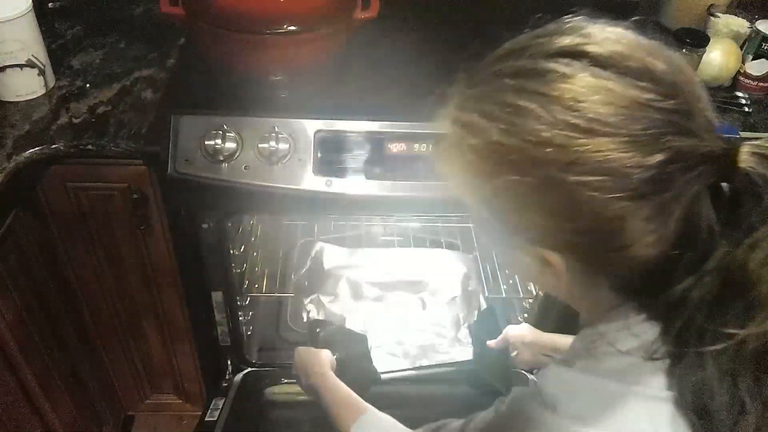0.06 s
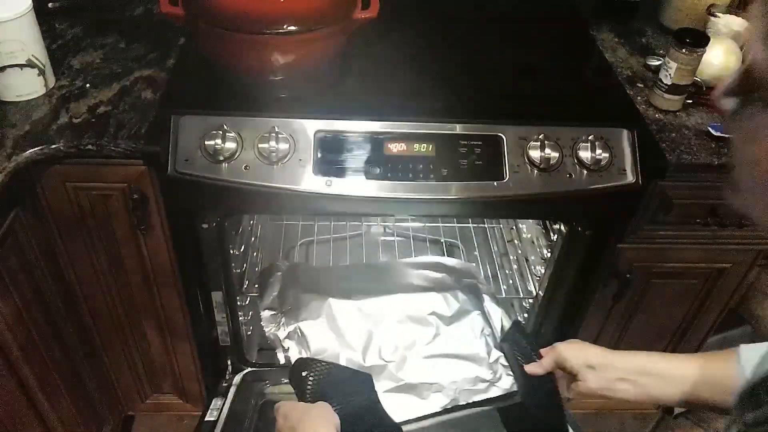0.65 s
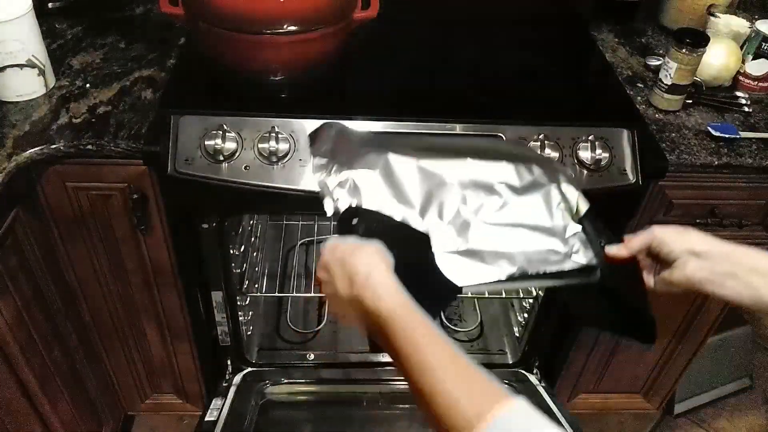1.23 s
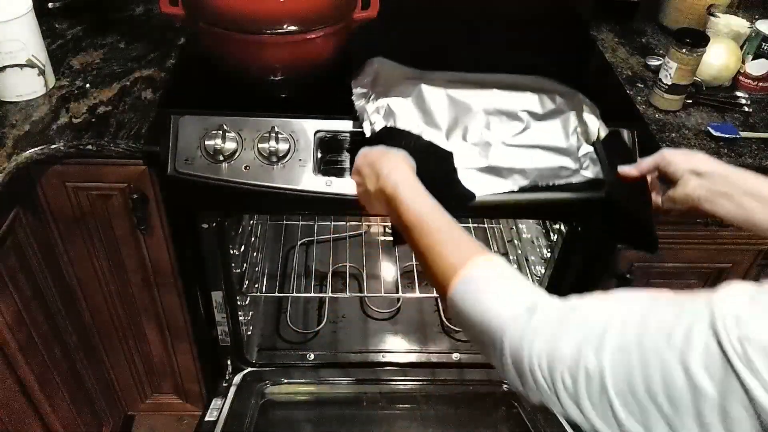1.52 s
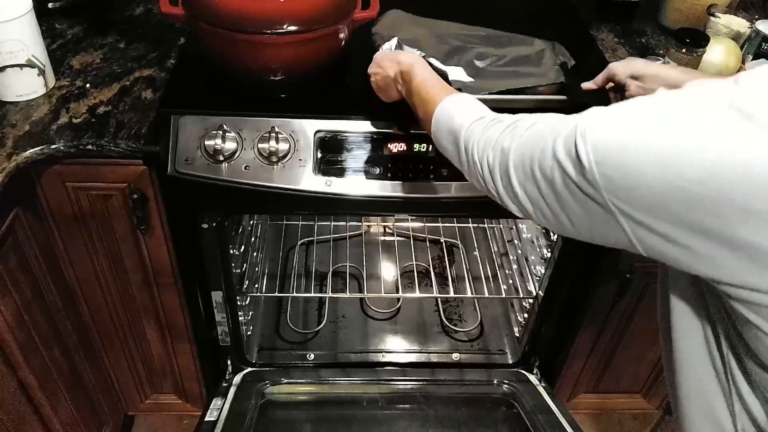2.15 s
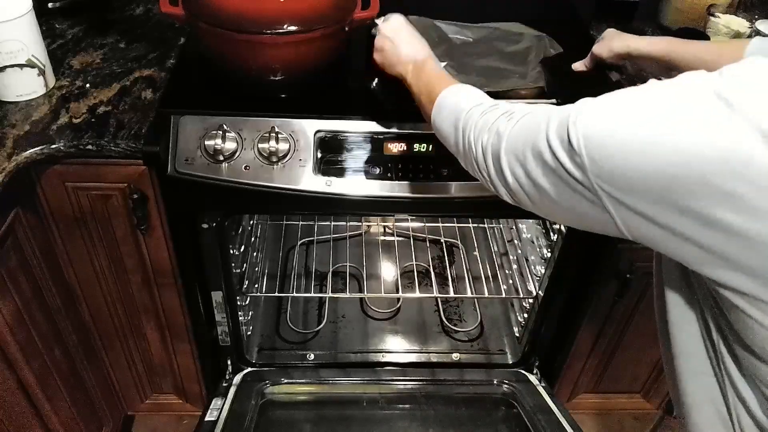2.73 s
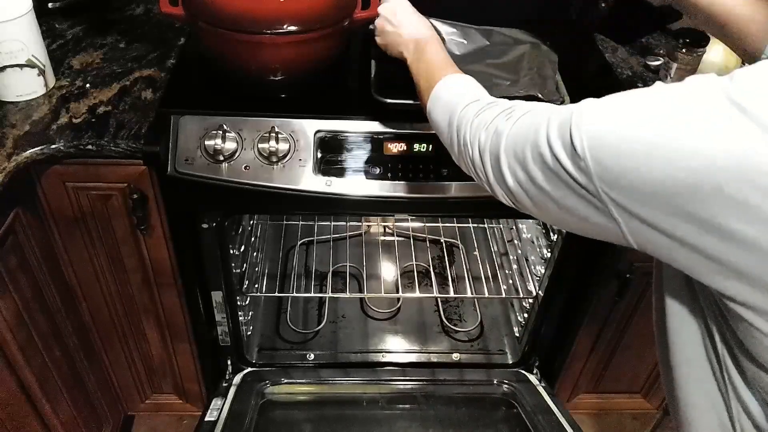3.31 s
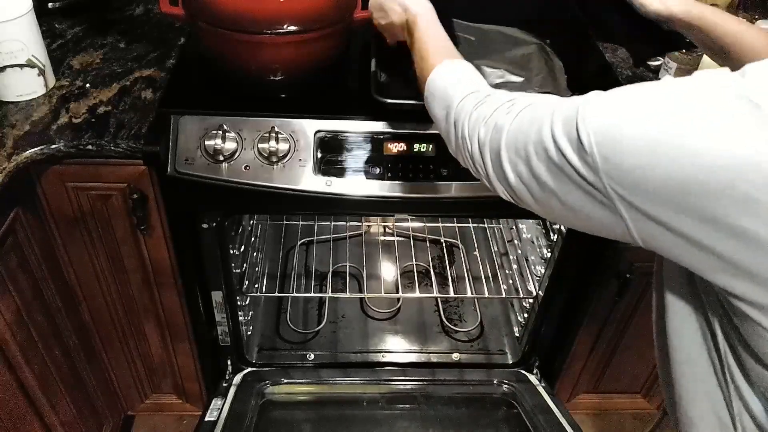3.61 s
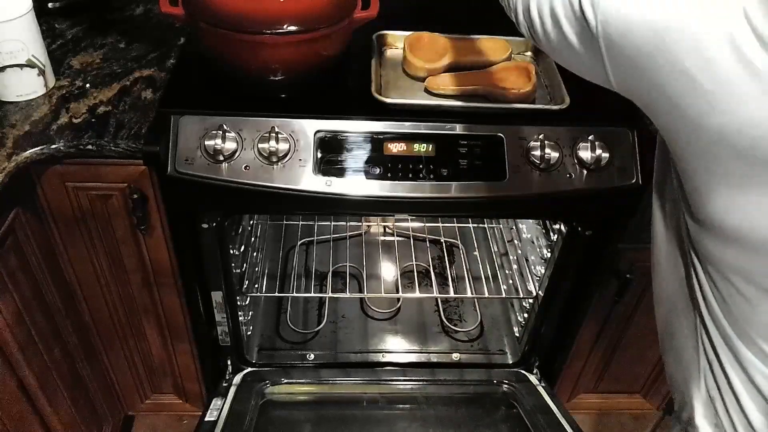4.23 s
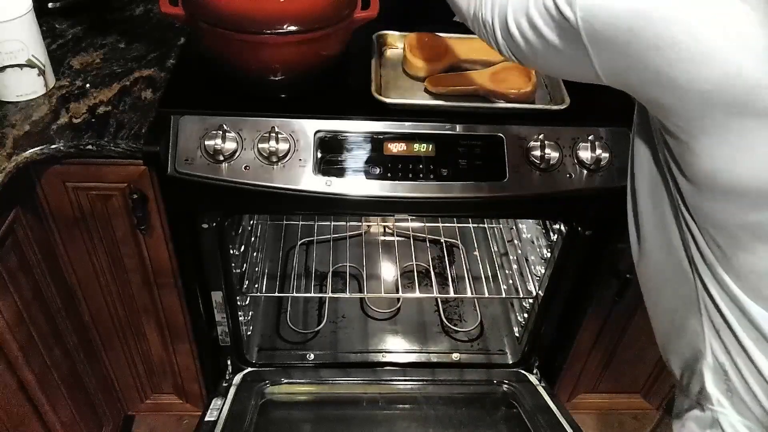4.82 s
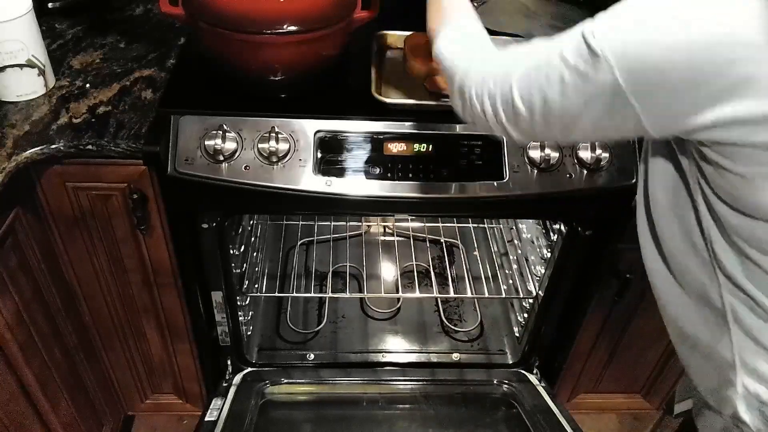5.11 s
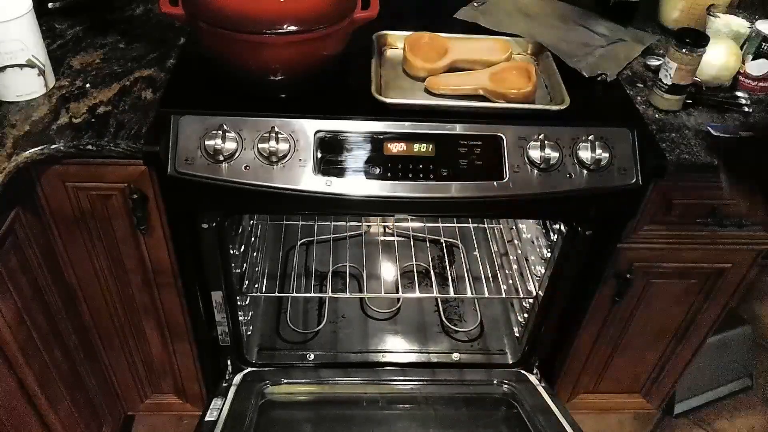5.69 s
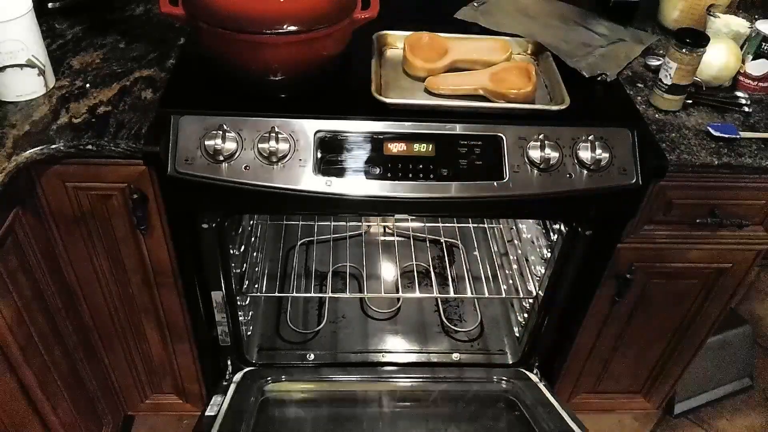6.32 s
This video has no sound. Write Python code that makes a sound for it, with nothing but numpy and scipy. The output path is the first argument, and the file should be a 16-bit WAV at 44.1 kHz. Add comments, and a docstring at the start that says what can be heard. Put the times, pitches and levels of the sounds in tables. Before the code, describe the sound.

In a reverberant home kitchen with a low rumble and faint electrical hum, a baking pan's rim lightly grazes the stove before the pan clatters onto the glass top, ringing briefly. Two softer knocks follow as it is nudged. Thin foil crinkles and snaps in uneven flurries for a couple of seconds as it is pulled off, then settles to a faint rustle. Everything is heard from close by.

```python
"""A metal baking pan, lifted from the oven, clanks down on a glass stovetop and knocks twice more as it
is shifted. Each contact clacks the glass, rings the pan and thuds the stove's case; the rim grazes first.
The pan's foil cover is peeled back and swept aside: countless tiny creases buckle and ring the thin sheet.
A hard kitchen reverberates around it all, over a low rumble, soft hiss and a faint mains hum."""
import sys
import numpy as np
from scipy import signal
from scipy.fft import rfft, irfft
from scipy.io import wavfile
from scipy.ndimage import uniform_filter1d

SR = 44100
rng = np.random.default_rng(int(sys.argv[2]) if len(sys.argv) > 2 else 0)


def bounce(signal):
    """Save signal as a 16-bit WAV file at the path given by the first command-line argument."""
    frames = np.transpose(np.atleast_2d(signal))
    limited = np.clip(frames, -1, 1)
    pcm = np.round(limited * 32767).astype(np.int16)
    wavfile.write(sys.argv[1], SR, pcm)


N = 280234
T = np.arange(N) / SR
RING_T = T[:SR]  # one second for each decay


# The pan lands corner after corner; a lone corner sounds thinner than the flat base:
# start_s, strength_db, brightness_hz, bass_cut_hz, ring_trim_db, thud_trim_db
PAN_HITS = [(2.2709, -2, 6460, 270, -0.5, -28), (2.2731, -5.5, 7400, 300, -16, -32),
            (2.2739, -1.5, 1020, 263, -17, -27), (2.2940, -12, 1200, 257, -7, -20),
            (2.7800, -13, 3200, 710, -20, -22), (2.7831, -11, 6000, 297, -9.5, -20),
            (2.7868, -9.5, 4440, 950, -16, -22), (2.798, -17.5, 4000, 805, -19, -27),
            (3.0612, -19.5, 1100, 100, -14, 18), (3.081, -22.5, 503, 100, -14, 8)]
# The pan's metallic ring: pitch_hz, relative_db, t60_s
PAN_RING = [(193, -7.5, 0.61), (278.5, -12, 0.53), (326.6, 9.5, 0.31), (402, 2, 0.18), (538, -8, 0.5),
            (563, -11, 0.35), (575, -14, 0.18), (686, 14.5, 0.11), (787, 4, .48), (800, 17, 0.13),
            (843, 6, 0.12), (920, -6, 0.36), (1036, -3, .3), (1118, -4, 0.26), (1183, 6, 0.2),
            (1380, -6, 0.52), (1495, -1, 0.42), (1668, -9, 0.31), (1785, -1, 0.63), (2580, -10, .25),
            (2740, -9, 0.26), (2900, -9, 0.28), (3430, -13, 0.27)]
# The dead clack of the heavily damped glass top: pitch_hz, relative_db, t60_s
GLASS_CLACK = [(161, -41, 0.17), (286, 2.5, 0.026), (574, -10, 0.09), (682, 7, 0.022), (890, 2.5, 0.01),
               (1223, -3.5, 0.014), (1694, 3, 0.013), (2410, 3, 0.006), (2836, 2, 0.0082),
               (3270, 4.5, 0.0058), (4110, -4, 0.0096), (4870, -37, 0.022)]
# The thud of the stove's sheet-metal case: pitch_hz, relative_db, t60_s
STOVE_THUD = [(48, -2.5, 0.52), (72, -2, 0.18), (116.5, -12.5, 0.21)]

def pan_knocks(clank_db, ring_db, thud_db, rattle_db, rattle_t60_s):
    """Each contact clanks on the glass, rings the pan and shakes the stove; the rim chatters briefly."""
    glass = undb(clank_db) * ring(GLASS_CLACK)
    metal = undb(ring_db) * ring(PAN_RING)
    thud = undb(thud_db) * ring(STOVE_THUD)
    out = np.zeros(N)
    for start_s, strength_db, brightness_hz, bass_cut_hz, ring_trim_db, thud_trim_db in PAN_HITS:
        # a small contact radiates little bass
        clank = signal.lfilter(*signal.butter(2, bass_cut_hz, "high", fs=SR), glass)
        chatter = undb(rattle_db) * unit_energy(rng.standard_normal(SR) * decay(rattle_t60_s))
        room = kitchen_reverb(wet_db=-6.5, predelay_s=0.0042, build_s=0.0068)
        blow = convolve(clank + convolve(clank, chatter), room) + undb(ring_trim_db) * metal
        # a softer contact pushes for longer and leaves the high modes still
        blow = signal.lfilter(*signal.butter(2, brightness_hz, fs=SR), blow)
        add(out, start_s, undb(strength_db) * (blow + undb(thud_trim_db) * thud))
    return out


# The rim grazes the stove on the way down: start_s, level_db
RIM_GRAZES = [(1.688, -59.5), (2.004, -54), (2.110, -52.5)]
# The zing of the pan's thin rolled edge: pitch_hz, relative_db, t60_s
RIM_RING = [(3150, -12, 0.0043), (3600, 0.5, 0.0038), (4340, 1.5, .005), (5070, -6.5, .006)]

def rim_scrapes(slip_t60_s):
    """Brief runs of stick and slip ring the rim."""
    pressure = np.zeros(N)
    for start_s, level_db in RIM_GRAZES:
        add(pressure, start_s, undb(level_db) * decay(slip_t60_s))
    slips = pressure * clicks(per_s=3700, spread_db=1)
    zing = convolve(slips, ring(RIM_RING))
    return convolve(zing, kitchen_reverb(wet_db=-2, predelay_s=0.0036, build_s=0.0056))


# The bright snap of a crease: freq_hz, relative_db
CRINKLE_EQ = [(200, -25), (1000, -15.5), (2000, -8.5), (2800, -4), (3900, -3.5), (5000, -3), (6200, -6),
              (8500, -4.5), (11000, -1), (12800, -1), (14300, -6.5), (15700, -26)]
# The lower rustle of the whole sheet flexing: freq_hz, relative_db
FLEX_EQ = [(120, 3), (400, 2), (780, 7.5), (1200, -5.5), (2000, 4), (2800, 1.5), (5000, -4.5), (9000, -6)]

def foil_crinkle(crinkle_db, flex_db, peak_snaps_per_s, flurry_db, patches=6):
    """Creases buckle in flurries all over the sheet, more of them the harder it is pulled."""
    flurries = undb(flurry_db * drift(rate_hz=77))
    pull, flexing = flurries * foil_handling()
    per_s = peak_snaps_per_s * np.sqrt(pull / pull.max())
    snaps = pull * clicks(per_s, spread_db=-1.5)
    flaps = flexing * clicks(per_s, spread_db=3.5)
    snap_tone = undb(crinkle_db) * eq_response(CRINKLE_EQ)
    flap_tone = undb(flex_db) * eq_response(FLEX_EQ)
    # every patch of the sheet reaches the microphone along its own echoes
    patch_of = rng.integers(0, patches, N)
    out = np.zeros(N)
    for patch in range(patches):
        here = patch_of == patch
        rustle = convolve(snaps * here, snap_tone) + convolve(flaps * here, flap_tone)
        out += convolve(rustle, kitchen_reverb(wet_db=0, predelay_s=0.00034, build_s=0.00033))
    return out


# The foil stirs faintly while carried, between tugs and once laid aside: time_s, level_db
FOIL_STIR = [(0, -58.5), (.1, -77), (1.4, -72.5), (1.8, -69.5), (3.38, -60), (4.6, -63.5), (5.2, -70),
             (5.95, -67), (6.35, -69)]
# The foil is jolted, gripped, peeled or swept aside: start_s, rise_s, hold_s, level_db, flex_trim_db
FOIL_TUGS = [(1.996, 0.14, 0.15, -67, 7), (2.262, 0.014, 0.055, -37, 6), (2.418, 0.02, 0.09, -59.5, 16.5),
             (2.665, 0.041, 0.038, -44, 5.5), (2.746, 0.028, 0.037, -31.5, 0.5),
             (2.884, 0.01, 0.012, -46, 10), (3.027, 0.028, 0.072, -38.5, -2), (3.5, 0.049, .05, -59.5, 6),
             (3.579, 0.0092, 0.018, -40, -2), (3.636, .02, 0.088, -53.5, 8.5),
             (3.726, 0.04, 0.044, -38, -6), (3.869, .02, .07, -49, -2), (4.102, 0.013, 0.079, -55, 3),
             (4.169, 0.011, 0.033, -39.5, -16), (4.325, 0.034, .17, -49, -1.5),
             (4.6, 0.057, 0.057, -55, 0.5), (4.725, 0.055, 0.011, -36.5, -1),
             (4.782, .025, 0.047, -28.5, -10), (4.926, 0.016, 0.063, -49.5, -1)]
# A larger fold gives way in a quick run of snaps: start_s, level_db
FOIL_FOLDS = [(0.901, -52.5), (1.954, -51), (2.091, -51), (2.551, -49), (2.974, -33), (3.147, -34.5),
              (3.306, -44.5), (3.452, -50), (3.99, -39.5), (4.113, -48.5), (4.338, -43.5), (4.450, -37),
              (5.719, -55.5)]

def foil_handling(stir_flex_db=6, settle_t60_s=0.21, fold_t60_s=0.071, fold_rise_s=0.0064):
    """Envelopes of the pull on the foil and of its flexing: each tug rises, holds and settles."""
    pull = undb(np.interp(T, *np.transpose(FOIL_STIR)))
    flexing = pull * undb(stir_flex_db)
    for start_s, rise_s, hold_s, level_db, flex_trim_db in FOIL_TUGS:
        since_release_s = np.maximum(RING_T - rise_s - hold_s, 0)
        tug = undb(level_db) * attack(rise_s) * decay(settle_t60_s, since_release_s)
        add(pull, start_s, tug)
        add(flexing, start_s, undb(flex_trim_db) * tug)
    for start_s, level_db in FOIL_FOLDS:
        fold = undb(level_db) * attack(fold_rise_s) * decay(fold_t60_s)
        add(pull, start_s, fold)
        add(flexing, start_s, fold)
    return np.array([pull, flexing])


# The kitchen's reverb tail: freq_hz, t60_s
KITCHEN_DECAY = [(100, 0.75), (300, 0.46), (800, 0.57), (2500, 0.5), (6000, 0.59), (14000, 0.24)]

def kitchen_reverb(wet_db, predelay_s, build_s, bands=8):
    """Impulse response: direct sound, then echoes off cabinets and tiles, the top treble dying first."""
    freq_hz = np.fft.rfftfreq(SR, 1 / SR)
    noise_spectrum = rfft(rng.standard_normal(SR))
    centres_hz = np.geomspace(100, 15000, bands)
    tail = np.zeros(SR)
    for centre_hz, solo in zip(centres_hz, np.eye(bands)):
        band_gain = at_hz(np.c_[centres_hz, solo], freq_hz)
        tail += irfft(noise_spectrum * band_gain, SR) * decay(at_hz(KITCHEN_DECAY, centre_hz))
    response = undb(wet_db) * unit_energy(tail * attack(build_s, RING_T - predelay_s))
    response[0] += 1  # direct sound
    return response


# Low rumble with a trace of hiss: freq_hz, relative_db
ROOM_TONE_EQ = [(20, -2), (40, 0), (60, -4), (90, -11), (160, -12), (280, -13), (500, -19), (800, -20),
                (1300, -27), (2500, -34.5), (6000, -41), (12400, -40), (13200, -34.5), (15500, -43)]

def room_tone(level_db, waver_db):
    """A bed of dark noise whose level wavers slightly."""
    air = convolve(rng.standard_normal(N), eq_response(ROOM_TONE_EQ))
    return air * undb(level_db + waver_db * drift(rate_hz=7.4))


# An appliance's low drone: pitch_hz, level_db
HUM_TONES = [(39, -60), (119, -64)]

def appliance_hum(waver_db, wobble_rad):
    """Low sine tones, each wandering in level and phase."""
    out = np.zeros(N)
    for pitch_hz, level_db in HUM_TONES:
        amplitude = np.sqrt(2) * undb(level_db + waver_db * drift(rate_hz=1.7))
        out += amplitude * np.sin(2 * np.pi * pitch_hz * T + wobble_rad * drift(rate_hz=6.4))
    return out


def ring(modes):
    """A struck body: damped sines, summed to unit energy."""
    partials = (undb(db) * np.sin(2 * np.pi * hz * RING_T) * decay(t60_s) for hz, db, t60_s in modes)
    return unit_energy(sum(partials))


def clicks(per_s, spread_db):
    """Sparse random clicks of unequal size, with unit mean power."""
    chance = np.clip(per_s / SR, 0, 1)
    size = undb(spread_db * np.clip(rng.standard_normal(N), -2, 2))
    impulses = (rng.random(N) < chance) * rng.choice([-1, 1], N)
    return impulses * size / np.sqrt(chance * np.mean(size ** 2))


def drift(rate_hz):
    """Glides between random values, with unit spread."""
    step = int(SR / rate_hz)
    held = np.repeat(rng.standard_normal(N // step + 1), step)
    glide = uniform_filter1d(held, step)[:N]
    return glide / glide.std()


def eq_response(curve, size=4096):
    """Minimum-phase, unit-energy impulse response of an EQ curve."""
    gain = undb(at_hz(curve, np.fft.rfftfreq(size, 1 / SR)))
    cepstrum = irfft(np.log(gain))
    cepstrum[1:size // 2] *= 2
    cepstrum[size // 2 + 1:] = 0
    return unit_energy(irfft(np.exp(rfft(cepstrum))))


def at_hz(curve, freq_hz):
    """Read a curve on a log-frequency axis."""
    points_hz, values = np.transpose(curve)
    return np.interp(np.log(np.maximum(freq_hz, 1)), np.log(points_hz), values)


def attack(rise_s, time_s=RING_T):
    """Linear rise to full level."""
    return np.clip(time_s / rise_s, 0, 1)


def decay(t60_s, time_s=RING_T):
    """Exponential fall, 60 dB in t60_s."""
    return np.exp(-np.log(1000) * time_s / t60_s)


def undb(db):
    """Decibels to gain."""
    return 10 ** (np.asarray(db) / 20)


def unit_energy(response):
    """Scale a response so its squares sum to one."""
    return response / np.sqrt(np.sum(response ** 2))


def convolve(sound, response):
    """Pass a sound through a response, keeping its length."""
    return signal.fftconvolve(sound, response)[:len(sound)]


def add(track, start_s, sound):
    """Mix a sound into a track."""
    start = max(int(start_s * SR), 0)
    track[start:start + len(sound)] += sound[:N - start]


def scene():
    """Pan and foil over the kitchen's rumble and hum, in mono."""
    knocks = pan_knocks(clank_db=15.5, ring_db=14, thud_db=-1.5, rattle_db=-1.5, rattle_t60_s=0.035)
    foil = foil_crinkle(crinkle_db=-4.0, flex_db=-7.0, peak_snaps_per_s=5500, flurry_db=2.0)
    scrapes = rim_scrapes(slip_t60_s=0.14)
    air = room_tone(level_db=-51, waver_db=0.41)
    hum = appliance_hum(waver_db=3.0, wobble_rad=1.39)
    return (knocks + foil + scrapes + air + hum)[None]


def record(dry):
    """The microphone rounds the loudest peaks; a steep low-pass cuts the very top."""
    ceiling, top_hz = undb(-0.5), 15650
    rounded = ceiling * np.tanh(dry / ceiling)
    return signal.sosfilt(signal.ellip(10, .2, 70, top_hz, fs=SR, output="sos"), rounded)


dry = scene()
out = record(dry)
bounce(out)
```